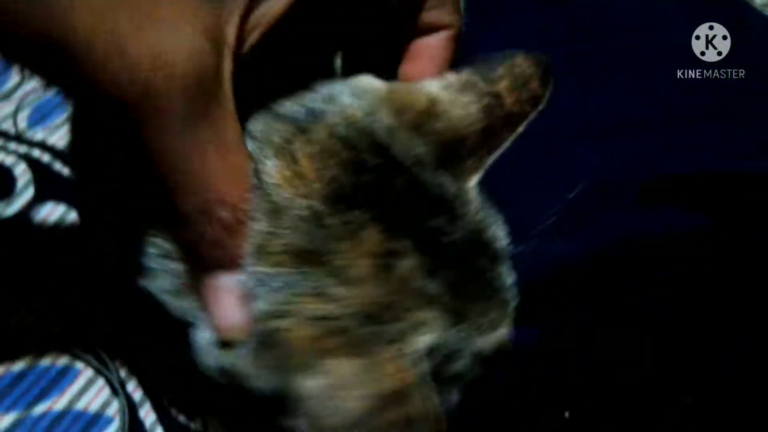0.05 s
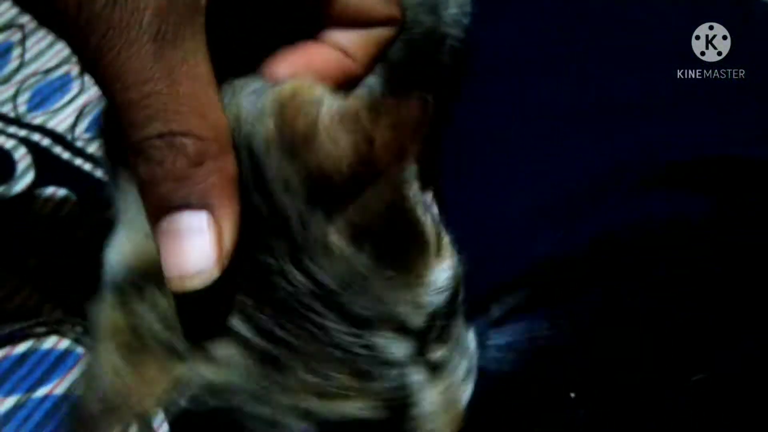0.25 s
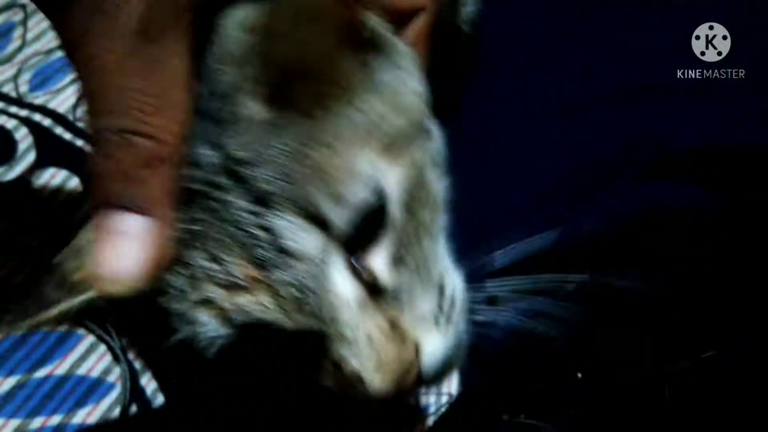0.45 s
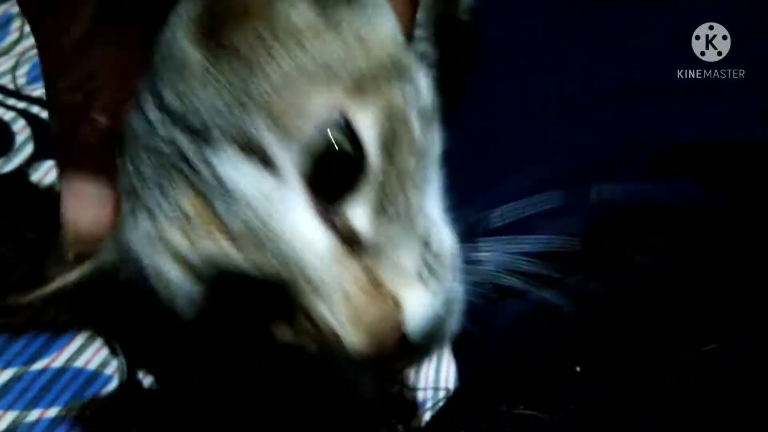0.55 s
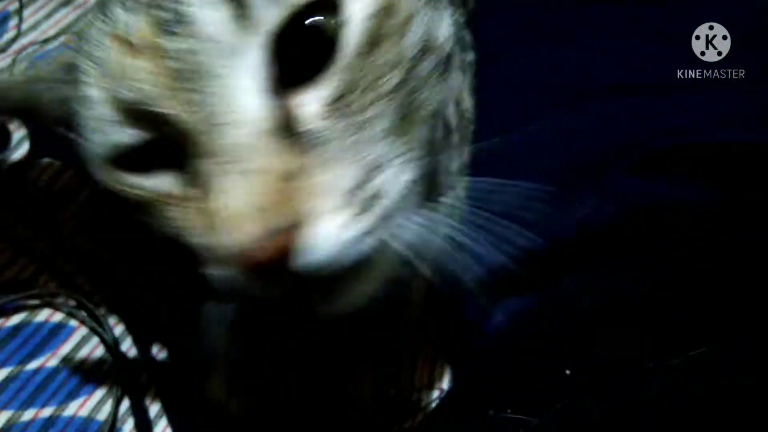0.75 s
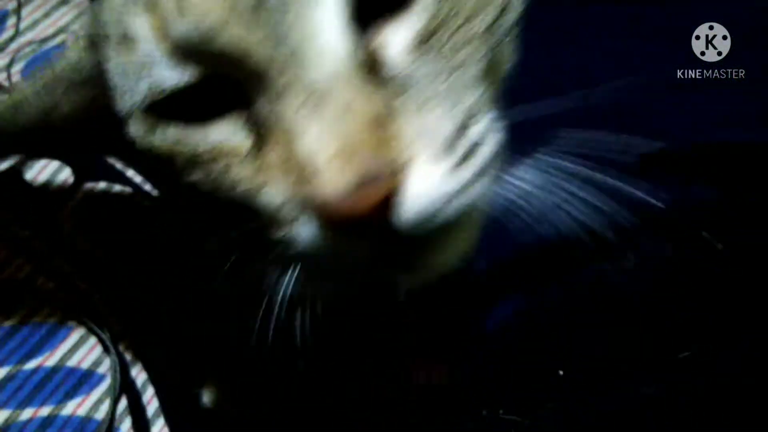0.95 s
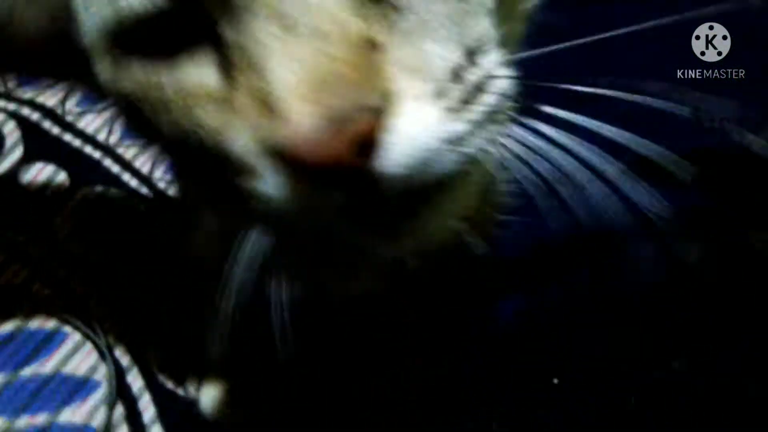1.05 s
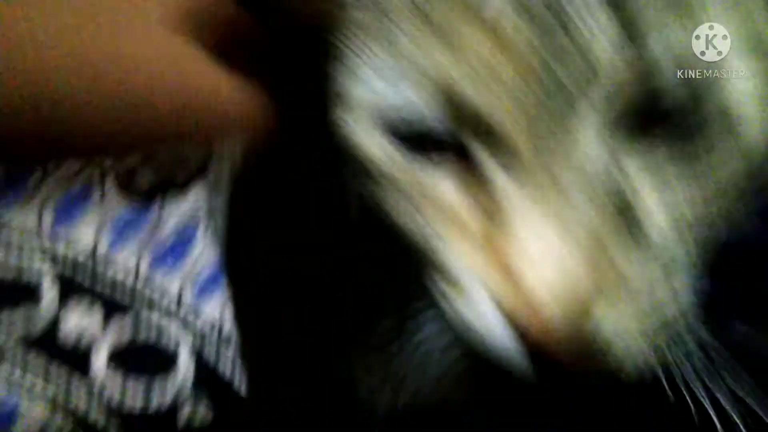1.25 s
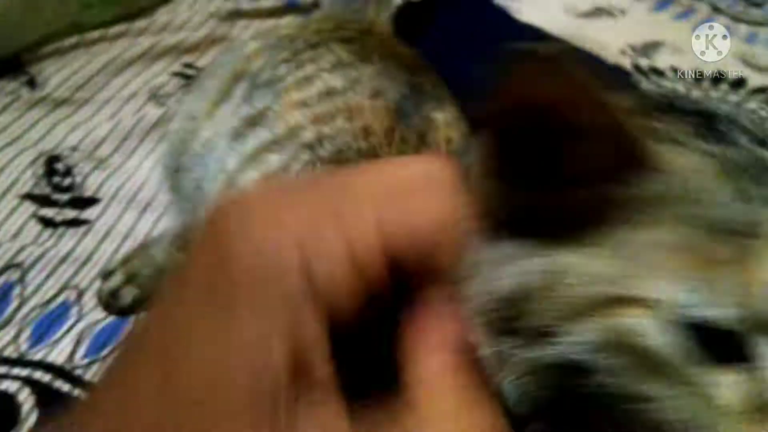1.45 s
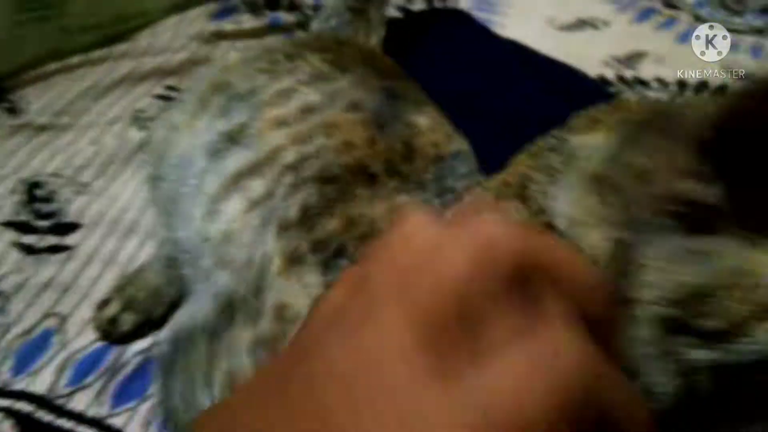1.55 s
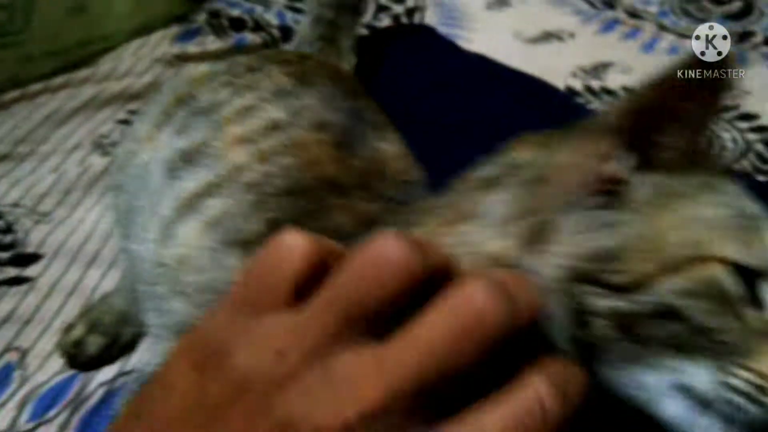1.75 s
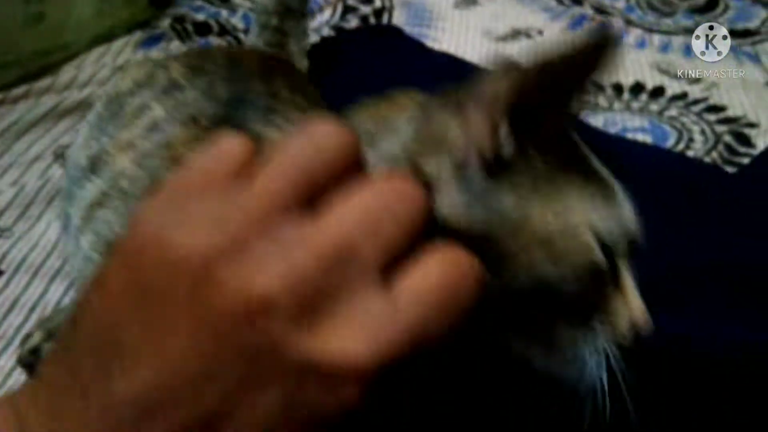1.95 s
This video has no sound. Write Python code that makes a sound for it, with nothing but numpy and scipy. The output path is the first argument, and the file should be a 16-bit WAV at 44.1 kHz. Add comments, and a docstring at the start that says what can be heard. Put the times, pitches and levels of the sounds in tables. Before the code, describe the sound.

Fingers scratch a cat's head in short, dry, rasping strokes very close to the microphone. Fingertips land with soft thuds and a low hand rumble, then the strokes come quicker, over the faint hiss of a quiet room.

```python
"""Scratching a cat's head

Fingers work very close to a hand-held phone in a quiet room. Fingertips land with a soft thud that
rings in head and hand, plus a brief crunch of hair, then drag through the fur in short dry strokes:
dense hair clicks over a low skin rub. The moving hand rumbles, a few hairs tick, the room hisses."""
import sys
import numpy as np
from scipy import signal
from scipy.fft import rfft, irfft
from scipy.io import wavfile
from scipy.ndimage import uniform_filter1d

SR = 44100
rng = np.random.default_rng(int(sys.argv[2]) if len(sys.argv) > 2 else 0)


def dump_mix(stems):
    """Bounce the given channels to the path in sys.argv[1] as a 16-bit WAV at rate SR."""
    frames = np.atleast_2d(stems).T  # one column per channel
    limited = np.clip(frames, -1, 1)  # hard clip at full scale
    pcm = np.round(limited * 32767).astype(np.int16)
    wavfile.write(sys.argv[1], SR, pcm)


N = 88200
TOUCH_SAMPLES = 20480
TOUCH_TIME_S = np.arange(TOUCH_SAMPLES) / SR

# room tone (frequency [Hz], density [dB])
ROOM_SPECTRUM = [(20, -17), (60, -14), (135, 3.5), (210, -1.5), (260, -1), (300, 6.5), (350, -4.5),
                 (470, -7.5), (800, -9), (1600, -19), (4000, -24), (10000, -24), (15500, -32.5)]
# hairs and nails snapping free (time [s], level [dB], fall [s], tilt [dB/oct], left-right [dB])
HAIR_TICKS = [(0.0506, -44, 0.0013, -1, 5), (0.1185, -43.5, 0.0013, 5, -1), (0.4634, -48, 0.0013, 3, 2),
              (0.7582, -39.5, 0.0016, -2, -1), (1.2884, -42, 0.0022, 1.5, -6), (1.2952, -35, 0.0015, 2, 6),
              (1.8542, -50, .0015, 0, -11)]
# hair rasp (frequency [Hz], density [dB])
HAIR_SPECTRUM = [(100, 4.5), (330, 0), (650, -6), (1050, -7), (1650, 1.5), (2700, -2.5), (3400, 0.5),
                 (4400, 0.6), (5400, 1), (6300, -2.5), (7600, -3), (9500, -3.5), (12000, -4), (15500, -5.5)]
# narrow peaks in every rasp (frequency [Hz], width [Hz], lift [dB])
RASP_PEAKS = [(1700, 170, 2.5), (2224, 170, 4), (3260, 420, 4), (4440, 150, 2.5), (5500, 800, 3)]
# drags through fur (start [s], length [s], rasp level [dB], peak position [0-1], tilt [dB/oct],
# hollow centre [Hz], hollow half-width [oct], hollow lift [dB], left-right [dB], rub level [dB])
FUR_STROKES = [(0.094, 0.3, -53, 0.55, 1, 3100, 0.41, 9.5, -4, -62),
               (0.228, 0.15, -39.5, 0.34, -0.65, 5300, 0.1, 7, 1.5, -61),
               (0.471, 0.13, -40.5, 0.31, -0.1, 5100, 0.39, 4.5, 2.5, -51.5),
               (0.775, .092, -45, 0.44, -0.1, 5660, .3, 0.5, 1.5, -50),
               (0.943, 0.11, -42.5, 0.41, 1.2, 3550, .3, 2, 3.5, -53.5),
               (1.006, 0.12, -39, 0.35, -2.76, 3450, 0.73, 2, 1.5, -64),
               (1.306, 0.11, -44.5, 0.41, -0.2, 2490, 0.11, 12, 3, -49),
               (1.385, .036, -50, 0.45, 1, 2400, .3, 5, 6.5, -49),
               (1.417, 0.05, -43.5, 0.3, -1.8, 3300, 0.16, 3, 4, -49.5),
               (1.482, 0.09, -53, 0.38, -0.2, 2400, .3, 5.5, 2, -54),
               (1.567, 0.11, -38, 0.36, 0.4, 3530, 0.36, 5, 3, -47.5),
               (1.68, 0.097, -36, 0.43, -1, 2050, .35, 4, 3.5, -57),
               (1.763, 0.11, -47, 0.52, 0.5, 4040, .25, 6, 3, -57)]
# skin sliding on the head (frequency [Hz], density [dB])
RUB_SPECTRUM = [(50, -28), (120, -3.5), (200, -4), (350, -6.5), (600, -15), (1200, -27), (3000, -42)]
# fingertips landing (time [s], thud level [dB], push length [s], ring re push [dB], pad re push [dB],
# crunch level [dB], thud left-right [dB], crunch left-right [dB])
FINGER_LANDINGS = [(0.2317, -23.5, 0.005, -1, -8, -41.5, 6, 3),
                   (.448, -28.5, 0.0065, 2, -4.5, -41.5, 4.5, 3),
                   (0.7586, -22.5, 0.0042, 3, -11, -45, 4, 1.5),
                   (0.9239, -23.5, 0.0037, 0.5, -12, -39.5, 3, 3.5),
                   (1.2876, -24.5, 0.0072, 1.5, -2, -46, 6.5, 11)]
# lighter knocks of a following finger (time [s], level [dB], push length [s], left-right [dB])
FINGER_KNOCKS = [(0.4608, -25.5, 0.0063, 8.5), (0.85, -34, 0.0055, 4), (1.439, -37, .0035, 9),
                 (1.608, -42, 0.0041, 10), (1.848, -43, 0.011, 0)]
# modes of head and hand (frequency [Hz], t60 [s], level [dB])
HEAD_HAND_MODES = [(52.2, 0.17, -10.5), (107.5, 0.21, -14.5), (191.4, 0.11, -9), (262.8, 0.13, -12),
                   (321.2, 0.11, -14.5), (399.3, 0.11, -17), (574, 0.026, -18), (852, 0.025, -22)]
# finger pad settling (frequency [Hz], density [dB])
PAD_SPECTRUM = [(60, -7), (200, 5.5), (400, -4.5), (520, -9.5), (900, -13.5), (1300, -34), (4000, -50)]
# hand moves (start [s], level [dB], fall [s], left-right [dB])
HAND_MOVES = [(0.236, -39, 0.049, -5), (.455, -29, 0.046, -3), (0.764, -37, 0.071, -8),
              (0.929, -39.5, 0.086, -2), (1.294, -33.5, 0.14, -4), (1.581, -50, .08, -3),
              (1.83, -51, .12, -6)]
# hand rumble (frequency [Hz], density [dB])
RUMBLE_SPECTRUM = [(12, 0.5), (25, 10), (50, -2.5), (80, -9.5), (150, -24), (300, -22.5), (700, -61)]


def undb(db):
    """Decibels to gain."""
    return 10 ** (np.asarray(db) / 20)


def unit(x):
    """Scale to rms 1."""
    return x / np.sqrt(np.mean(x ** 2))


def bins_hz(x):
    """FFT bin frequencies, floored at 1 Hz."""
    return np.maximum(np.fft.rfftfreq(x.shape[-1], 1 / SR), 1)


def colour(x, spectrum, tilt_db_oct=0):
    """Apply a spectrum, tilted above 1024 Hz; rms 1."""
    octave = np.log2(bins_hz(x))
    hz, db = np.array(spectrum).T
    gain_db = np.interp(octave, np.log2(hz), db) + tilt_db_oct * np.maximum(octave - 10, 0)
    return unit(irfft(rfft(x) * undb(gain_db)))


def stereo(x, correlation):
    """Mix two independent signals into a correlated pair."""
    correlation = np.clip(correlation, -.99, .99)
    mid, side = np.sqrt(1 + correlation) * x[0], np.sqrt(1 - correlation) * x[1]
    return np.array([mid + side, mid - side])


def touch_noise(spectrum):
    """Coloured stereo noise, one touch long."""
    return colour(stereo(rng.standard_normal((2, TOUCH_SAMPLES)), correlation=0.56), spectrum)


def arch(start_s, length_s, peak=0.42):
    """Skewed half-sine, topping at a fraction of its length."""
    corners_s = [start_s, start_s + length_s * peak, start_s + length_s]
    return np.sin(np.pi / 2 * np.interp(TOUCH_TIME_S, corners_s, [0, 1, 0]))


def burst(hold_s, fall_s):
    """Instant onset, hold, exponential fall."""
    return np.exp(-np.maximum(TOUCH_TIME_S - hold_s, 0) / fall_s)


def place(x, start_s, db, pan_db):
    """Set a touch at its time, level and side."""
    sides = unit(undb(np.array([[pan_db], [-pan_db]]) / 2))
    return np.pad(undb(db) * sides * x, ((0, 0), (int(start_s * SR), N)))[:, :N]


def room_tone(level_db=-59, wide_above_hz=2320):
    """Faint room noise: lows alike on both sides, hiss wide."""
    correlation = 1 / (1 + (np.fft.rfftfreq(N, 1 / SR) / wide_above_hz) ** 2)
    white = irfft(stereo(rfft(rng.standard_normal((2, N))), correlation), N)
    return undb(level_db) * colour(white, ROOM_SPECTRUM)


def reflect(x, span_s=.006, level_db=-9, count=8):
    """Early reflections between hand, head and phone, new per touch and microphone."""
    paths = np.zeros((2, int(span_s * SR) + 2))
    for path in paths:
        path[rng.integers(1, len(path), size=count)] = rng.standard_normal(count)
        path *= undb(level_db) / np.linalg.norm(path)
        path[0] = 1  # direct sound
    return signal.fftconvolve(x, paths, axes=1)[:, :TOUCH_SAMPLES]


def resonate(x):
    """Lift the rasp's narrow peaks."""
    lift_db = sum(db / (1 + (2 * (bins_hz(x) - hz) / width_hz) ** 2) for hz, width_hz, db in RASP_PEAKS)
    return irfft(rfft(x) * undb(lift_db))


def hair_rasp(tilt_db_oct, clicks_per_s=16000, spread_db=2.2, shared_power=0.54, max_lag_s=.00016,
              flutter_db=.5, flutter_hz=130):
    """Hairs click off a nail; some reach both microphones a moment apart, some only one."""
    shape = (3, TOUCH_SAMPLES)  # left, right, shared
    slips = rng.random(shape) < clicks_per_s / SR
    clicks = slips * rng.standard_normal(shape) * undb(spread_db * rng.standard_normal(shape))
    lag_samples = int(rng.uniform(-0.92, 1) * max_lag_s * SR)
    shared = np.array([clicks[2], np.roll(clicks[2], lag_samples)])
    heard = np.sqrt(shared_power) * shared + np.sqrt(1 - shared_power) * clicks[:2]
    uneven_drag = unit(uniform_filter1d(rng.standard_normal(TOUCH_SAMPLES), int(SR / flutter_hz)))
    heard *= undb(flutter_db * uneven_drag)
    return colour(resonate(reflect(heard)), HAIR_SPECTRUM, tilt_db_oct)


def ticks():
    """Tiny snaps as a nail or hair slips."""
    return sum(place(hair_rasp(tilt_db_oct) * burst(0, fall_s), start_s, db, pan_db)
               for start_s, db, fall_s, tilt_db_oct, pan_db in HAIR_TICKS)


def hollow(x, centre_hz, half_width_oct, lift_db):
    """One resonance of the air under the fingers; rms 1."""
    offset = np.log2(bins_hz(x) / centre_hz) / half_width_oct
    return unit(irfft(rfft(x) * undb(lift_db / (1 + offset ** 2))))


def strokes():
    """Hair rasp over low skin rub, both following finger speed."""
    out = 0
    for start_s, length_s, rasp_db, peak, tilt_db_oct, *cavity, pan_db, rub_db in FUR_STROKES:
        speed = arch(0, length_s, peak)
        rasp = hollow(hair_rasp(tilt_db_oct), *cavity) * speed ** 2.41
        rub = touch_noise(RUB_SPECTRUM) * speed ** 2
        out += place(rasp, start_s, rasp_db, pan_db) + place(rub, start_s, rub_db, pan_db)
    return out


def thud(push_s, ring_db):
    """Soft push, spring-back and low ring of head and hand, detuned per microphone."""
    push = arch(0, push_s)
    rebound = 0.53 * arch(push_s, 0.64 * push_s) ** 2
    age_s = np.maximum(TOUCH_TIME_S - push_s, 0)
    ring = 0
    for hz, t60_s, db in HEAD_HAND_MODES:
        detune = 1 + 0.015 * rng.standard_normal() + 0.041 * rng.standard_normal((2, 1))
        ring += undb(db - 60 * age_s / t60_s) * np.sin(2 * np.pi * hz * detune * age_s)
    return rebound - push + undb(ring_db) * ring


def landings():
    """Fingertips land: thud, dull rub of the pad, crunch of flattened hair."""
    out = 0
    for start_s, db, push_s, ring_db, pad_db, crunch_db, thud_pan_db, crunch_pan_db in FINGER_LANDINGS:
        rise = np.minimum(TOUCH_TIME_S / push_s, 1)
        pad = undb(pad_db) * touch_noise(PAD_SPECTRUM) * rise * burst(push_s, fall_s=0.011)
        crunch = hair_rasp(tilt_db_oct=-3.3) * burst(hold_s=0.0024, fall_s=0.011)
        out += place(thud(push_s, ring_db) + pad, start_s, db, thud_pan_db)
        out += place(crunch, start_s, crunch_db, crunch_pan_db)
    return out


def hand_rumble(rise_s=0.032):
    """The hand rumbles as it moves on, then settles."""
    rise = np.minimum(TOUCH_TIME_S / rise_s, 1)
    taper = 1 - TOUCH_TIME_S / TOUCH_TIME_S[-1]
    return sum(place(touch_noise(RUMBLE_SPECTRUM) * rise * burst(rise_s, fall_s) * taper,
                     start_s, db, pan_db) for start_s, db, fall_s, pan_db in HAND_MOVES)


def knocks():
    """A following finger lands: thud only."""
    return sum(place(thud(push_s, ring_db=-4), start_s, db, pan_db)
               for start_s, db, push_s, pan_db in FINGER_KNOCKS)


def scene():
    """Finger and hand sounds over room tone."""
    return landings() + knocks() + strokes() + ticks() + hand_rumble() + room_tone()


def record(dry, cutoff_hz=15500):
    """The phone's steep low-pass."""
    return signal.sosfilt(signal.ellip(10, .2, 80, cutoff_hz, fs=SR, output="sos"), dry)


dry = scene()
out = record(dry)
dump_mix(out)
```